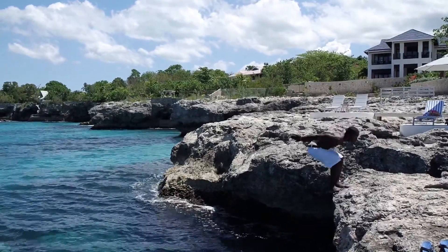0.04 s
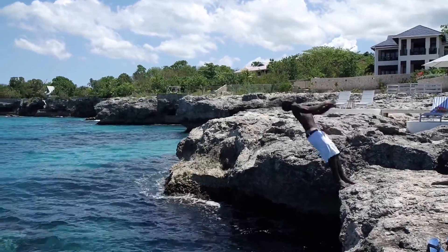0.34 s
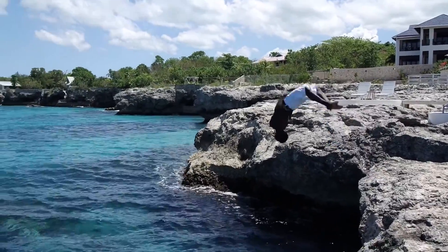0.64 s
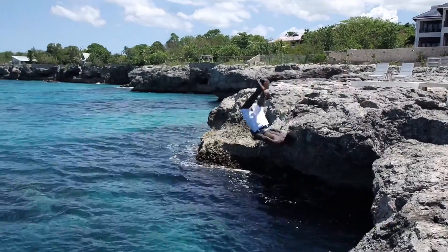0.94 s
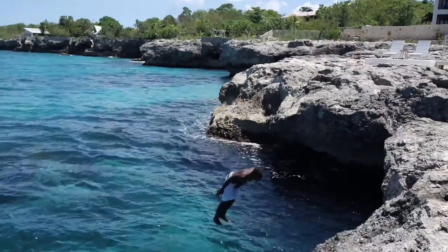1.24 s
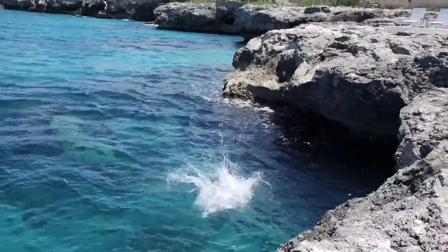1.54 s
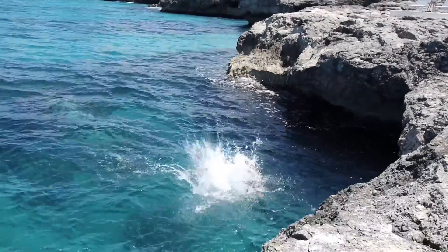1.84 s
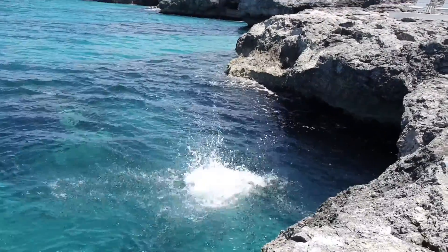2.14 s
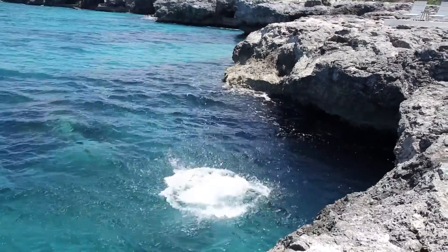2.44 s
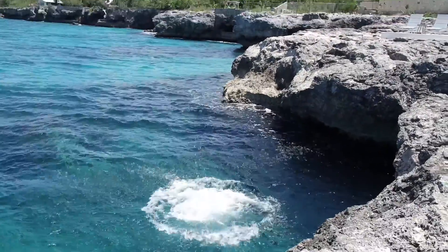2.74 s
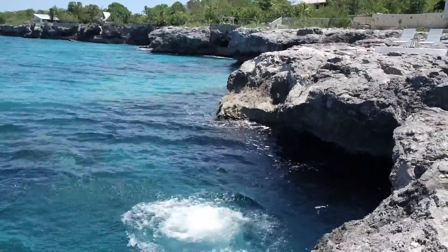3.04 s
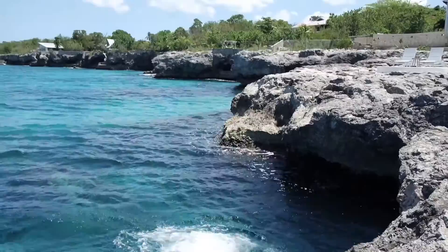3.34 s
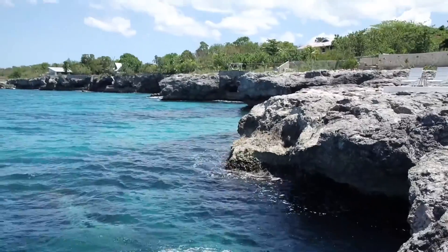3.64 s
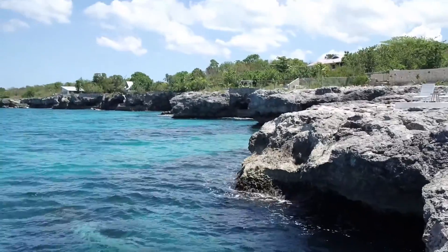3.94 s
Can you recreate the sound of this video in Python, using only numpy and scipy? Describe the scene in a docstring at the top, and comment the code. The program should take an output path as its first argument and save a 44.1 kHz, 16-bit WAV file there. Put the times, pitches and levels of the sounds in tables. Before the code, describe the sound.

Loud, gusty wind rumbles and rasps on the microphone for all four seconds, with small pops on either side. At about 1.5 seconds a diver hits the sea with a quiet slap and plunge, and faint spray and foam fizz until around 3 seconds. The wind thins into separate buffets around the splash, cracks loudly on the left at 2.5 seconds, then blows more fully again.

```python
"""Loud, gusty wind rumbles and rasps on a microphone, far above a quiet splash in the sea.
The wind tears at the two microphone openings (ports), each on its own. It thins into separate
buffets around the splash, and the left port overloads once with a loud crack.
The splash is a diver jumping off a low cliff: a short slap as the body hits, a plunge as the
air pocket closes, then spray falling back and fizzing foam."""
import sys
import numpy as np
from scipy import signal
from scipy.fft import rfft, irfft
from scipy.io import wavfile
from scipy.ndimage import uniform_filter1d

SR = 44100
rng = np.random.default_rng(int(sys.argv[2]) if len(sys.argv) > 2 else 0)


def transcribe(signal):
    """Save signal, clipped to [-1, 1], as a 16-bit WAV file at the path in sys.argv[1]."""
    frames = np.atleast_2d(signal).T
    limited = np.clip(frames, -1, 1)
    pcm = np.round(limited * 32767).astype(np.int16)
    wavfile.write(sys.argv[1], SR, pcm)


N = 176400
TIME = np.arange(N) / SR
FREQS_HZ = np.arange(N // 2 + 1) * SR / N

# Strength of the wind's low rumble and higher rasp:
# t/s, left rumble/dB, right rumble/dB, left rasp/dB, right rasp/dB
GUSTS = [(0.0, -24.5, -15.5, -27, -27.5), (0.15, -25.5, -18, -29, -33.5), (0.45, -23, -18.5, -31, -28),
         (0.58, -24.5, -19.0, -33, -31.0), (0.68, -23.5, -20, -34, -32.5), (0.85, -20.5, -15, -29.5, -33.5),
         (1.05, -19.5, -15.5, -30.5, -36), (1.16, -28, -24.5, -42.5, -47.5), (1.25, -22, -21.5, -34.5, -43),
         (1.35, -20.5, -15, -34.5, -39.5), (1.57, -24.5, -17.5, -37.5, -32.5), (1.64, -21, -20, -44.5, -56),
         (1.7, -23, -19, -26.5, -33), (1.8, -23, -16.5, -45, -32.5), (1.9, -32, -22, -57, -49),
         (2.05, -23.5, -22, -42.5, -40.5), (2.14, -30, -16.5, -59, -42), (2.2, -16, -18, -31, -38),
         (2.23, -30, -27, -73, -42.5), (2.38, -29.5, -25.5, -38, -58), (2.49, -20.5, -17.5, -36.5, -37.0),
         (2.54, -29.5, -26.5, -38.5, -49), (2.68, -28, -24, -44.5, -44), (2.85, -17, -16, -29.5, -44.5),
         (3.04, -19, -17.5, -54, -27), (3.1, -20, -19.5, -50.0, -50.5), (3.16, -21, -17, -35, -30),
         (3.29, -38, -16, -69, -39), (3.37, -21.5, -17, -33.5, -32), (3.54, -24, -19, -37.5, -36.0),
         (3.65, -22.5, -17, -33.5, -32.5), (4.0, -19.5, -15.5, -32, -33.5)]
# Tone colour of the swirling air: f/Hz, relative level/dB
TURBULENCE = [(20, -13), (50, -1), (110, 0), (280, 1), (480, -1), (750, -7.5), (1100, -14.5), (1600, -25),
              (2300, -37), (3500, -51.5), (6000, -76), (15000, -67)]
# The hardest hits of air on a port: t/s, peak/dB, width/s, left minus right/dB
JOLTS = [(.371,-8,.00026,18), (0.5378,-8,0.00018,21), (.9922,-8.5,0.00023,26), (1.0654,-8.5,0.00021,-26),
         (1.1565,-16,0.00023,15), (1.202,-21,0.00078,-27), (1.2168,-15.5,0.0002,28),
         (1.2427,-12.5,0.00024,30), (1.3138,-10.5,0.00033,7), (1.3863,-10.5,0.00036,10),
         (1.4083,-9,0.00025,18), (1.4917,-5.5,0.00025,21), (1.573,-11,0.0002,15), (1.7228,-7,0.00065,10),
         (1.7572,-8.5,0.00026,18), (1.7628,-14,.00039,-13), (1.8412,-8.5,0.00046,15),
         (1.8698,-11,0.00047,-24), (1.872,-7,0.00053,-23), (1.9094,-19.5,0.00032,-3),
         (1.9402,-11.5,0.00055,-8.5), (2.1111,-10.5,.0007,-28), (2.1135,-12,0.0004,-20),
         (2.1204,-6,0.0011,22), (2.124,-8.5,0.00037,-27), (2.131,-11.5,.00033,27), (2.1443,-10,0.0014,-15),
         (2.2096,-5.5,0.00021,-45), (2.2551,-13,.00047,-22), (2.259,-17.5,0.00026,25),
         (2.2932,-16.5,.00023,22), (2.3657,-18,0.0003,12), (2.4447,-12.5,0.00029,22),
         (2.4947,-16,0.00037,-17), (2.503,-7,.00033,29), (2.5109,-13.5,0.00055,23), (2.5135,-6,.00026,20),
         (2.6311,-22.5,0.00016,20), (2.8216,-15,0.0002,24), (2.8855,-7,0.0002,29), (2.9307,-2,0.00024,33),
         (2.9908,-13.5,0.00021,23), (3.0319,-11.5,0.00024,23), (3.2631,-10.5,0.0005,17),
         (3.4331,-10,0.0003,26)]


def wind():
    """Air swirls at each port on its own; the noise swells and brightens with each eddy (small whirl)."""
    rumble_db, rasp_db = wind_levels()
    rumble_gain_db = rumble_db - turbulence_db(40, 700)
    rasp_gain_db = rasp_db - turbulence_db(900, 2500)
    noise_spectrum = rfft(rng.standard_normal((2, N)))
    pressure = noise_spectrum * from_db(at_hz(TURBULENCE, FREQS_HZ)) * np.sqrt(SR / 2)
    edges_hz = 18 * 2 ** np.arange(0, 9.6, .5)   # half-octave bands
    rumble_hz, rasp_hz, treble_hz = 293, 1160, 4000
    out = 0
    for low, high in zip(edges_hz, edges_hz[1:]):
        # Low bands follow the rumble, higher ones the rasp; the treble swings wider still.
        share = at_hz([(rumble_hz, 0), (rasp_hz, 1), (treble_hz, 1.47)], np.sqrt(low * high))
        band = irfft(pressure * ((FREQS_HZ >= low) & (FREQS_HZ < high)), N)
        out = out + band * from_db((1 - share) * rumble_gain_db + share * rasp_gain_db)
    return out


def wind_levels():
    """Rumble and rasp at each port in dB: gusts, eddies that get patchier in lulls, buffets and jolts."""
    # Single short shoves of air: t/s, rumble/dB, rasp/dB, left minus right/dB
    buffets = [(0.177,-15.5,-25,0), (.222,-13,-41,1), (0.851,-23,-24,-1), (1.07,-11,-22.5,-28),
               (1.159,-36,-31,0.5), (1.33,-7.5,-32.5,0), (1.499,-28,-37,-15), (1.573,-10.5,-27,15),
               (1.677,-14,-29,5), (1.721,-13.5,-24,7), (1.738,-29,-34,12), (2.062,-8.5,-34,-25),
               (2.116,-9,-31,-6), (2.147,-9.5,-27.5,-15), (2.191,-24,-25.5,13), (2.206,-11,-28.5,-11),
               (2.303,-17,-31.5,4), (2.316,-28,-29.5,24), (2.366,-24.5,-30.5,0), (2.507,-16,-21,-3),
               (2.565,-35,-28.5,20), (2.61,-22,-32.5,2), (2.786,-30,-24.5,32), (2.823,-17,-28,6),
               (3.009,-20,-30,-27), (3.033,-14,-25.5,16), (3.126,-16.5,-24,8), (3.205,-14,-28,-13),
               (3.336,-15,-22.5,30), (3.382,-15,-23.5,12), (3.501,-13,-24,29)]
    rumble_db, rasp_db = np.split(in_time(GUSTS), 2)
    patchiness = np.clip(1 + 0.056 * (rasp_db.mean() - rasp_db), .5, 2)
    eddies = patchiness * np.array([drift(rate_hz=62.5) for port in range(2)])
    ripple = patchiness * np.array([drift(rate_hz=410) for port in range(2)])
    rumble_power = (from_db(rumble_db) * flutter(db=1.8 * eddies)) ** 2
    rasp_power = (from_db(rasp_db) * flutter(db=5.5 * eddies + 4.5 * ripple)) ** 2
    for t, low_db, high_db, pan_db in buffets:
        swell = pan(pan_db) ** 2 * swell_at(t, width_s=0.0037)
        rumble_power += swell * from_db(low_db) ** 2
        rasp_power += swell * from_db(high_db) ** 2
    for t, peak_db, _, pan_db in JOLTS:   # each jolt tears off a brief, quieter rasp
        rasp_power += (pan(pan_db) * from_db(peak_db - 19)) ** 2 * swell_at(t, width_s=0.00096)
    return 10 * np.log10(rumble_power), 10 * np.log10(rasp_power)


def snaps():
    """Tiny whirls of air strike each port at random, harder when the wind is rough."""
    # How quickly a tiny whirl passes: width/s
    widths = [.00023, .0003, .00045]
    snaps_per_s = 32
    age = np.arange(-128, 129) / SR
    pulses = 0
    for width in widths:
        strikes = rng.random((2, N)) < snaps_per_s / len(widths) / SR
        sizes = random_sizes(spread_db=2.5, max_db=5)
        pulses = pulses + signal.fftconvolve(strikes * sizes, push_pull(age, width)[None], mode="same")
    rasp_db = in_time(GUSTS)[2:]
    return from_db(rasp_db - 3.5) * rms_one(pulses)


def jolts():
    """The hardest eddies hit a port as one sharp push and pull."""
    out = np.zeros((2, N))
    for t, peak_db, width, pan_db in JOLTS:
        near = np.abs(TIME - t) < 20 * width
        out[:, near] += pan(pan_db) * from_db(peak_db) * push_pull(TIME[near] - t, width)
    return out


def cracks():
    """One loud overload crack on the left, later two faint, sharp wind ticks on the right."""
    # The crack and the two ticks: t/s, peak/dB, left minus right/dB
    bursts = [(2.5137, -5, 32), (3.387, -37, -20), (3.425, -36, -18)]
    decay_s = 0.00043
    grit = rng.choice([-1, 1], N)
    out = 0
    for t, peak_db, pan_db in bursts:
        fade = (TIME >= t) * np.exp(-np.minimum(np.abs(TIME - t) / decay_s, 20))
        out = out + pan(pan_db) * from_db(peak_db) * fade * grit
    return out


def water():
    """The diver slaps into the water; spray and foam rise out of the hiss of the sea."""
    # The body hits, then the air pocket closes: t/s, level/dB, hold/s, decay/s
    slaps = [(1.469, -31, 0.009, 0.0023), (1.4713, -28.5, 0.0008, 0.0008), (1.5942, -27.5, 0.0009, 0.0019)]
    # Hiss of sea and spray as heard, dipping briefly after the loudest wind hits: t/s, level/dB
    hiss = [(0, -61), (.68, -55.5), (.8, -53.5), (1.05, -53.5), (1.17, -56), (1.42, -52), (1.468, -53.5),
            (1.485, -42), (1.53, -45.5), (1.595, -40), (1.7, -51), (1.94, -46.5), (2.01, -49.5),
            (2.11, -42), (2.205, -47.5), (2.22, -53), (2.37, -53), (2.44, -47.5), (2.51, -50.5),
            (2.525, -53), (2.66, -54), (2.81, -50.5), (2.92, -51), (3.0, -52.5), (3.3, -54), (3.55, -55.5),
            (4, -54)]
    # Tone colour of the open sea: f/Hz, relative level/dB
    sea_colour = [(300, 21.5), (2000, 10), (4300, 4.5), (6500, -2.5), (8500, 1.5), (10500, 3), (13000, 2.5),
                  (15000, 2)]
    # Tone colour of the spray: f/Hz, relative level/dB
    spray_colour = [(300, -9.5), (1600, 6), (3200, 6), (4700, 2), (6200, 0.5), (7300, -1), (9000, 0.1),
                    (11200, 1.5), (12900, 4), (15000, -1.5)]
    attack_s = 0.00081
    hiss_db, = in_time(hiss)
    spray_share = np.interp(hiss_db, [-54, -51.5], [0, 1])   # louder hiss turns from sea to spray
    spray_power = spray_share * from_db(hiss_db) ** 2
    for t, level_db, hold, decay in slaps:
        age = TIME - t
        rise = np.clip(age / attack_s, 0, 1)
        fade = np.exp(-np.clip((age - hold) / decay, 0, 20))
        spray_power += (from_db(level_db) * rise * fade) ** 2
    sea = np.sqrt(1 - spray_share) * from_db(hiss_db) * colour(droplets(), sea_colour)
    spray = np.sqrt(spray_power) * colour(droplets(), spray_colour)
    return pan(db=-1) * (sea + spray)


def droplets():
    """Countless tiny drops and bursting bubbles over a smooth fizz, partly alike at both ports."""
    drops_per_s, drop_share, likeness = 6000, 0.98, 0.47
    sizes = random_sizes(spread_db=1.5, max_db=7.5)
    drops = rms_one(sizes * (rng.random((2, N)) < drops_per_s / SR))
    fizz = rng.standard_normal((2, N))
    common, opposite = np.sqrt(drop_share) * drops + np.sqrt(1 - drop_share) * fizz
    return np.sqrt(1 + likeness) * common + np.sqrt(1 - likeness) * opposite * [[1], [-1]]


def push_pull(age, width):
    """The pressure of a passing whirl: one push and one pull, of height 1."""
    phase = np.clip(age / width, -20, 20)
    return -2 * np.tanh(phase) / np.cosh(phase)


def swell_at(t, width_s):
    """A smooth swell of height 1 around time t."""
    return np.exp(-np.minimum(((TIME - t) / width_s) ** 2, 20))


def random_sizes(spread_db, max_db):
    """Random pushes and pulls for both ports: many small, a few larger."""
    size_db = np.minimum(spread_db * rng.exponential(1, (2, N)), max_db)
    return from_db(size_db) * rng.choice([-1, 1], (2, N))


def drift(rate_hz):
    """A smooth random wobble of typical size 1; a higher rate wobbles faster."""
    step, warm_up = 20, 2000   # one value every 20 samples
    memory = np.exp(-2 * np.pi * rate_hz * step / SR)
    noise = rng.standard_normal(N // step + warm_up + 2)
    smooth = signal.lfilter([1], [1, -2 * memory, memory ** 2], noise)[warm_up:]
    rounded = rms_one(np.tanh(rms_one(smooth) / 2))
    return np.interp(np.arange(N) / step, np.arange(len(rounded)), rounded)


def flutter(db):
    """Turn fast level changes into a gain that keeps the average power over 0.2 s near 1."""
    gain = from_db(db)
    return gain / np.sqrt(uniform_filter1d(gain ** 2, size=int(.2 * SR), axis=-1))


def turbulence_db(low_hz, high_hz):
    """Total level of the swirling air between two frequencies."""
    return 10 * np.log10(np.sum(from_db(at_hz(TURBULENCE, np.arange(low_hz, high_hz))) ** 2))


def colour(x, spectrum):
    """Give a sound a tone colour, at an average level of 1."""
    return rms_one(irfft(rfft(x) * from_db(at_hz(spectrum, FREQS_HZ)), N))


def in_time(rows):
    """Join a table's points in time: one curve for each level column."""
    times, *columns = np.transpose(rows)
    return np.array([np.interp(TIME, times, column) for column in columns])


def at_hz(points, hz):
    """Read a curve at any frequency, with octaves evenly spaced."""
    freqs, values = np.transpose(points)
    return np.interp(np.log(np.maximum(hz, 1)), np.log(freqs), values)


def pan(db):
    """Left and right gains: positive dB leans left, and the louder side stays at 1."""
    return from_db([[min(db, 0)], [min(-db, 0)]])


def from_db(db):
    """Turn decibels into a gain."""
    return 10 ** (np.asarray(db) / 20)


def rms_one(x):
    """Scale to an average (root mean square) level of 1."""
    return x / np.sqrt(np.mean(x ** 2) + 1e-20)


def scene():
    """Wind at the microphone over the water below."""
    return wind() + snaps() + jolts() + cracks() + water()


def record(dry):
    """The microphone rounds off the loudest peaks and cuts the highest treble."""
    cutoff_hz = 15700
    rounded = dry / (1 + dry ** 6) ** (1 / 6)
    return signal.sosfilt(signal.cheby2(20, 70, cutoff_hz, fs=SR, output="sos"), rounded)


dry = scene()
out = record(dry)
transcribe(out)
```